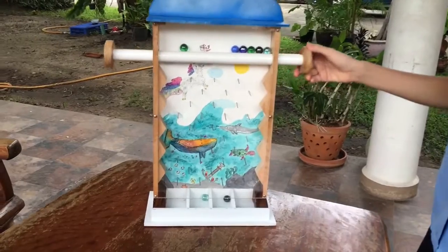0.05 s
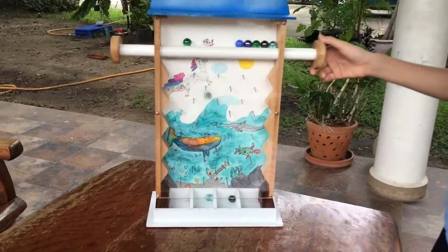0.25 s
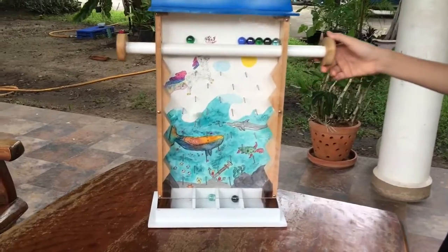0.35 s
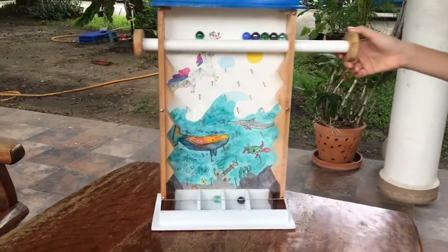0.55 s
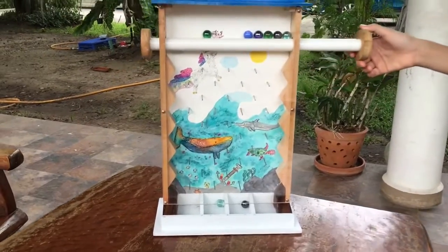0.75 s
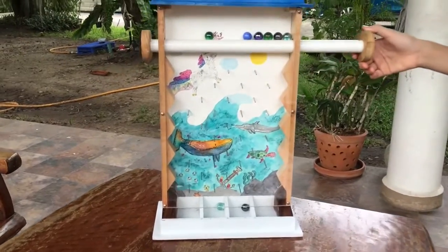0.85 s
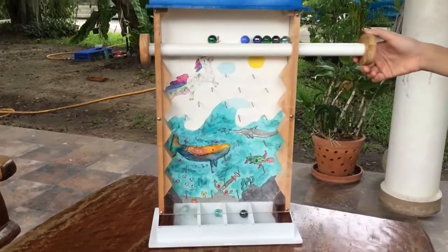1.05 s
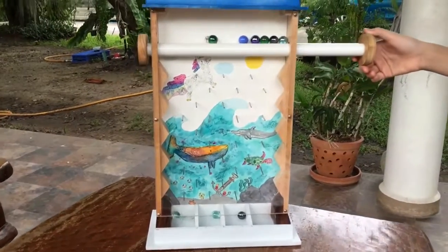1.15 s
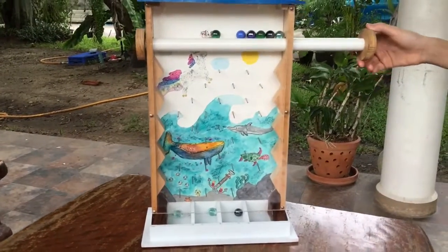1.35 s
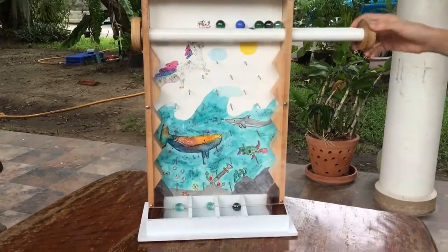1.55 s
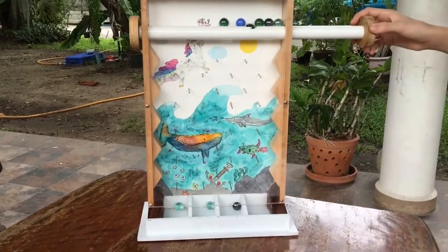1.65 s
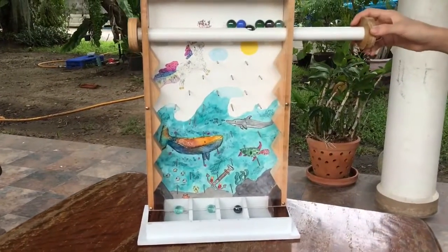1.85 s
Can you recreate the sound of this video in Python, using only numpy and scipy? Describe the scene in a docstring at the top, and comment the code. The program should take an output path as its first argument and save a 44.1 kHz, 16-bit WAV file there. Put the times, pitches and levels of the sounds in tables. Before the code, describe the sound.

A glass marble pings down a wooden peg board and bounces to rest in a tray.

```python
"""A feed rod rattles briefly, then a glass marble pings down through a wooden peg board on a porch.
Each peg rings and knocks the board. The marble clacks on the zigzag side rails and the tray dividers,
then bounces to rest in the tray; the rod knocks home and the frame rocks. Each hit is a few ringing
modes plus a noisy crack. The porch answers, over a low outdoor rumble and a few faint far chirps."""
import sys
import numpy as np
from scipy import signal
from scipy.fft import rfft, irfft
from scipy.io import wavfile
from scipy.ndimage import uniform_filter1d

SR = 44100
rng = np.random.default_rng(int(sys.argv[2]) if len(sys.argv) > 2 else 0)


def inscribe(sig):
    """Save sig as 16-bit PCM at rate SR to the path in sys.argv[1].

    A 1-D sig is mono; a 2-D sig holds one channel per row.
    Samples are clipped to [-1, 1] before scaling.
    """
    pcm = np.round(np.clip(np.atleast_2d(sig).T, -1, 1) * 32767)
    wavfile.write(sys.argv[1], SR, pcm.astype(np.int16))


N = 83790
BODY_SAMPLES = 10240
RISE_S, BOARD_RISE_S = 0.00081, 0.0012  # attack time constants


def amp(db):
    """Decibels to gain."""
    return 10 ** (np.asarray(db) / 20)


def unit(x):
    """Scales to rms 1."""
    return x / np.sqrt(np.mean(x ** 2) + 1e-20)


def decay(t, t60):
    """Envelope that falls 60 dB in t60 seconds."""
    return np.exp(-np.log(1000) * t / t60)


def read(points, hz):
    """Reads a curve on a log-frequency axis."""
    f, value = np.transpose(points)
    return np.interp(np.log(hz + 1), np.log(f + 1), value)


def add(mix, s, sound):
    """Mixes a sound in at time s."""
    part = mix[max(round(s * SR), 0):][:len(sound)]
    part += sound[:len(part)]


def colour(x, points, size=1024):
    """Minimum-phase EQ through (frequency [Hz], gain [dB]) points."""
    log_gain = np.log(amp(read(points, abs(np.fft.fftfreq(size, 1 / SR)))))
    taps = np.fft.ifft(np.exp(np.conj(signal.hilbert(log_gain)))).real
    return signal.fftconvolve(x, taps[:size // 2])[:len(x)]


def ring(modes, rise_s=RISE_S):
    """A struck body: dying sines of alternating sign with a quick attack."""
    t = np.arange(BODY_SAMPLES) / SR
    sines = sum((-1) ** k * amp(db) * decay(t, t60) * np.sin(2 * np.pi * hz * t)
                for k, (hz, db, t60) in enumerate(modes))
    return (1 - np.exp(-t / rise_s)) * sines


def burst(t60, count, even_hz=570):
    """Dying noise, evened out so that no wide band is favoured."""
    t = np.arange(count) / SR
    spectrum = rfft(rng.standard_normal(count) * decay(t, t60))
    band_power = uniform_filter1d(abs(spectrum) ** 2, int(even_hz * count / SR))
    even = irfft(spectrum / np.sqrt(band_power), count)
    fade = np.exp(-(t / t60 / 2) ** 2)
    return even * fade * np.sqrt(SR * t60 / (2 * np.log(1000)))


def crack(eq, level_db, t60, top_t60, split_hz=4470, count=2048):
    """Many short modes heard as one coloured burst; the treble has its own decay."""
    low = signal.lfilter(*signal.butter(4, split_hz, fs=SR), burst(t60, count))
    high = signal.lfilter(*signal.butter(4, split_hz, "high", fs=SR), burst(top_t60, count))
    shaped = colour(low + high * np.sqrt(t60 / top_t60), eq, size=512)
    mean_gain = np.sqrt(np.mean(amp(read(eq, np.linspace(0, SR / 2, SR // 100))) ** 2))
    return np.pad(amp(level_db) * shaped / mean_gain, (0, BODY_SAMPLES - count))


def strikes(hits, body, bands_hz=(900, 2200, 5200, 12000)):
    """Plays a body once per hit; a four-band EQ stands for where and how hard it is struck."""
    out = np.zeros(N)
    for s, *tone_db in hits:
        add(out, s, colour(body(), list(zip(bands_hz, tone_db))))
    return out


# spectrum of the outdoor bed (frequency [Hz], relative level [dB])
AIR_SPECTRUM = [(20, -31), (45, -10.5), (80, 1.5), (130, -2), (190, -10), (290, -8.5), (500, -25),
                (1050, -23), (2000, -32.5), (4300, -37.5), (5500, -41.5), (9500, -53), (11000, -53),
                (16000, -57)]

def air(level_db=-47):
    """The bed: steady outdoor rumble with a trace of hiss."""
    gain = amp(read(AIR_SPECTRUM, np.fft.rfftfreq(N, 1 / SR)))
    return amp(level_db) * unit(irfft(rfft(rng.standard_normal(N)) * gain, N))


# far chirps (time [s], length [s], start pitch [Hz], end pitch [Hz], level at mid-swell [dB])
CHIRPS = [(0.427, 0.077, 4850, 4150, -50), (1.511, .055, 5310, 4200, -50), (1.76, 0.071, 4600, 3910, -65),
          (1.79, 0.062, 2820, 2660, -61.5), (1.804, 0.042, 1830, 1656, -64)]

def chirps(fuzz_hz=387):
    """Faint falling whistles, roughened by low-passed noise."""
    out = np.zeros(N)
    lowpass = signal.butter(2, fuzz_hz, fs=SR, output="sos")
    for s, length, start_hz, end_hz, db in CHIRPS:
        fuzz = signal.sosfilt(lowpass, rng.standard_normal(BODY_SAMPLES))
        n = int(length * SR)
        tone = np.sin(2 * np.pi * np.cumsum(np.linspace(start_hz, end_hz, n)) / SR)
        add(out, s, amp(db) * np.hanning(n) * unit(tone * fuzz[:n]))
    return out


# reverb time of the porch (frequency [Hz], t60 [s])
PORCH_DECAY = [(200, .5), (900, 0.66), (2200, 0.64), (5000, 0.72), (9000, 0.98), (16000, 1.26)]
# EQ on the reverb (frequency [Hz], gain [dB])
PORCH_EQ = [(200, 0), (370, 2.5), (600, 1), (1000, 0), (1450, 2.5), (2200, -0.5), (5000, -2.5), (9000, -2),
            (16000, -5)]

def porch(send, early_db=-12, early_delay_s=0.004, tail_db=-14, tail_delay_s=0.014):
    """Reverb return: quick echoes from table and frame, then the tail of the porch."""
    hz, t, noise = signal.stft(rng.standard_normal(SR), SR, nperseg=256)
    _, tail = signal.istft(noise * decay(t, read(PORCH_DECAY, hz)[:, None]), SR, nperseg=256)
    early = burst(t60=0.18, count=BODY_SAMPLES)
    echo = np.zeros(SR)
    add(echo, early_delay_s, amp(early_db) * early / np.linalg.norm(early))
    add(echo, tail_delay_s, amp(tail_db) * tail / np.linalg.norm(tail))
    return signal.fftconvolve(send, colour(echo, PORCH_EQ))[:N]


# low modes of the frame (frequency [Hz], level [dB], t60 [s])
FRAME_MODES = [(267.5, -1.5, 0.11), (329, -1.5, 0.12), (380, -1.5, 0.05), (630, -12, 0.061),
               (916, -6, 0.043)]

def frame_thud():
    """The wooden frame answers a jolt with a hollow thud."""
    return ring(FRAME_MODES, BOARD_RISE_S)


# rod knocks (time [s], bass [dB], middle [dB], treble [dB], top [dB])
ROD_HITS = [(.012, -16, -23.5, -35, -15), (.021, -16, -29, -29, -12), (.030, -23, -26.5, -29.5, -15),
            (1.5610, -6.5, -11, -29, -21.5), (1.5902, 3.5, 0.5, -1.5, -11.5)]
# ring of the rod (frequency [Hz], level [dB], t60 [s])
ROD_MODES = [(480, -39, 0.026), (697, -45.5, 0.061), (950, -39.5, 0.035), (1230, -36.5, .04),
             (1750, -29, 0.032), (2300, -32, 0.016), (2823, -17, 0.026), (2850, -49, 0.17),
             (4510, -29, 0.01)]
# colour of its attack (frequency [Hz], relative level [dB])
ROD_CRACK = [(60, -23), (300, -3.5), (1000, -2.5), (2500, -1.5), (3500, 0.5), (4600, -3), (7000, -9.5),
             (9500, -13.5), (11000, -19), (16000, -26)]
# the frame rocking on the table (time [s], gain [dB])
FRAME_ROCKS = [(1.5963, -26.5), (1.6160, -29), (1.64, -40.5)]

def rod():
    """The feed rod knocks in its frame, which rocks briefly after the last knock."""
    modes = ring(ROD_MODES)
    out = strikes(ROD_HITS, lambda: modes + crack(ROD_CRACK, level_db=-22.5, t60=0.04, top_t60=0.031))
    for s, db in FRAME_ROCKS:
        add(out, s, amp(db) * frame_thud())
    return out


# bounces in the tray (time [s], bass [dB], middle [dB], treble [dB], top [dB])
TRAY_HITS = [(1.0526, 2.5, 6, -0.5, -3.5), (1.0755, -2.5, -11, -16.5, -19), (1.1775, -5, -0.5, -9, -7.5),
             (1.2622, -8, -5, -16, -8), (1.3196, -9, -6, -17, -16), (1.3606, -14.5, -9.5, -22.5, -18),
             (1.3876, -16, -12, -27, -18.5), (1.4070, -19, -18.5, -50.5, -32)]
# ring of the tray floor (frequency [Hz], level [dB], t60 [s])
TRAY_MODES = [(329.4, -38.5, 0.17), (497, -33.5, 0.074), (700, -34.5, 0.037), (937, -30.5, 0.12),
              (1029, -31.5, 0.079), (1253, -25, 0.033), (1827, -15.5, 0.022), (1960, -16.5, 0.019),
              (2080, -23.5, 0.03), (2347, -20.5, 0.049), (2630, -18, 0.011), (3090, -23, .022),
              (3450, -26, 0.031), (4150, -14, 0.01), (5250, -25.5, 0.016), (5780, -19, 0.012)]
# colour of its attack (frequency [Hz], relative level [dB])
TRAY_CRACK = [(300, -14), (1000, -13.5), (1500, -8.5), (2000, 0), (3300, 0), (4800, -9.5), (5700, -4.5),
              (7000, -15), (9200, -19), (10500, -33), (16000, -29)]

def tray():
    """The marble lands on the tray floor and settles in quickening, fading bounces."""
    modes = ring(TRAY_MODES, rise_s=0.00097)
    return strikes(TRAY_HITS,
                   lambda: modes + crack(TRAY_CRACK, level_db=-12.5, t60=0.02, top_t60=0.0074))


# clacks on side rails, then tray dividers (time [s], bass [dB], middle [dB], treble [dB], top [dB])
CLACK_HITS = [(.4948, 3, -1, 2.5, -4.5), (.6022, 1.5, 1, -7.5, -7.5), (.8468, -7.5, 0.5, -19, -9),
              (.9527, -17.5, -4, -22, -30), (.9744, -20, -4.5, -13.5, -17)]
# ring of the struck wood (frequency [Hz], level [dB], t60 [s])
CLACK_MODES = [(292, -36, 0.06), (460, -40, 0.025), (655, -27, 0.048), (949, -19, 0.06),
               (1166, -14.5, 0.04), (1302, -14.5, 0.044), (1738, -25, 0.05), (2046, -22, 0.032),
               (2357, -18.5, 0.03), (2673, -25.5, 0.049), (3252, -16, 0.019), (3486, -18.5, .035),
               (4040, -24, .035), (5125, -21.5, 0.044), (5800, -28.5, 0.031)]
# colour of its attack (frequency [Hz], relative level [dB])
CLACK_CRACK = [(300, -24), (1000, -2), (2000, -5), (2600, -6.5), (3400, 1.5), (4500, -6.5), (5300, 2),
               (6200, -9.5), (8200, -12), (10000, -22), (16000, -33)]

def rails_and_dividers():
    """Hard wooden clacks: three on the side rails, then two lighter ones on the tray dividers."""
    modes = ring(CLACK_MODES)
    return strikes(CLACK_HITS,
                   lambda: modes + crack(CLACK_CRACK, level_db=-10.5, t60=0.021, top_t60=0.0098))


# ring of the board (frequency [Hz], level [dB], t60 [s])
BOARD_MODES = [(437, -38, 0.045), (566, -35, 0.031), (647.6, -26.5, 0.05), (971, -22, 0.043),
               (1466, -32.5, 0.028), (1806, -27, 0.018), (2250, -24.5, 0.016)]
# colour of its attack (frequency [Hz], relative level [dB])
BOARD_CRACK = [(300, -7.5), (1000, -3.5), (1500, -6.5), (2300, -1), (4500, -6), (7000, -15), (16000, -32)]

def board_knock():
    """The woody knock that a struck peg passes on to the board."""
    return ring(BOARD_MODES, BOARD_RISE_S) + crack(BOARD_CRACK, level_db=-28, t60=0.036, top_t60=0.038)


# high modes of the board that ring in the tick (frequency [Hz], level [dB], t60 [s])
TICK_MODES = [(3410, -55.5, 0.032), (4700, -50, .04), (5800, -44, 0.05), (7300, -42.5, 0.047),
              (9450, -42.5, 0.052), (12960, -43, 0.036), (13800, -41, 0.035)]
# colour of its attack (frequency [Hz], relative level [dB])
TICK_CRACK = [(500, -13), (3500, -13.5), (6000, 6), (7300, 3), (8200, -3), (9500, 3.5), (10400, -4.5),
              (13000, 4.5), (16000, 1)]

def glass_tick(top_db):
    """The bright tick of glass meeting a peg, with a high shelf for sparkle."""
    tick = ring(TICK_MODES) + crack(TICK_CRACK, level_db=-26, t60=0.031, top_t60=0.026)
    return colour(tick, [(9500, 0), (13500, top_db)])


# marble on the pegs (time [s], pitch [Hz], ring level [dB], ring t60 [s], overtone level [dB],
# board knock [dB], frame thud [dB], glass tick [dB], tick shelf [dB])
PEG_HITS = [(.2390, 1037, -22.5, 0.22, -42, -8, -41.5, -13.5, 6),
            (.2400, 924, -12, 0.042, -41, -5.5, -61.5, -20, -2),
            (0.2586, 942, -13, 0.14, -38, 2.5, -28.5, 1, 3),
            (.3059, 1057, -33.5, 0.12, -44, -3, -33, -15.5, 6),
            (0.3834, 1104, -33.5, 0.22, -27.5, 3, -30, -1, -16),
            (.4060, 947, -31.5, 0.21, -41, -15, -44.5, -24, 5),
            (.5255, 1020, -27.5, .15, -42, -7, -34, -5, -8),
            (.5730, 900, -31, 0.17, -58, -14, -31.5, -2, -4),
            (.6370, 952, -43, 0.11, -54, -8, -36, -17.5, -8),
            (.6820, 921, -40, 0.15, -42, -15, -45, -3, -6.5),
            (0.6883, 921, -24, 0.25, -62, -1, -35, -11, 2),
            (.7450, 918, -43, 0.18, -53.5, -23, -46, -15, 4.5),
            (0.81, 912, -29.5, 0.49, -48.5, -17, -37.5, 3, -2.5),
            (.9020, 907, -34, 0.27, -46.5, -12, -37, -8, 2),
            (0.9172, 944, -26.5, 0.16, -56, -0.5, -35.5, -11, -5)]

def pegs(overtone_ratio=6.15, split=0.0174, overtone_t60=0.075):
    """Each peg pings like a clamped rod, layered with a knock, a thud and a tick."""
    out = np.zeros(N)
    for s, hz, ring_db, t60, overtone_db, knock_db, thud_db, tick_db, top_db in PEG_HITS:
        # the peg bends a little differently in each plane, so its overtone is a beating pair
        pair = [(hz * overtone_ratio * (1 + side * split / 2), overtone_db + side * 2, overtone_t60)
                for side in (-1, 1)]
        ping = ring([(hz, ring_db, t60)], rise_s=0.0038) + ring(pair)
        knock = amp(knock_db) * board_knock()
        thud = amp(thud_db) * frame_thud()
        tick = amp(tick_db) * glass_tick(top_db)
        add(out, s, ping + knock + thud + tick)
    return out


def scene(far_send_db=16):
    """The toy up close over the outdoor bed; a hotter reverb send sets the chirps far back."""
    bed, far = air(), chirps()
    toy = pegs() + rails_and_dividers() + tray() + rod()
    reverb = porch(toy + amp(far_send_db) * far)
    return (toy + far + reverb + bed)[None]


def record(dry, cutoff_hz=16100):
    """A steep low-pass trims the very top of the mix."""
    lowpass = signal.firwin(255, cutoff_hz, window=("kaiser", 9), fs=SR)
    return signal.oaconvolve(dry, lowpass[None], "same")


dry = scene()
out = record(dry)
inscribe(out)
```